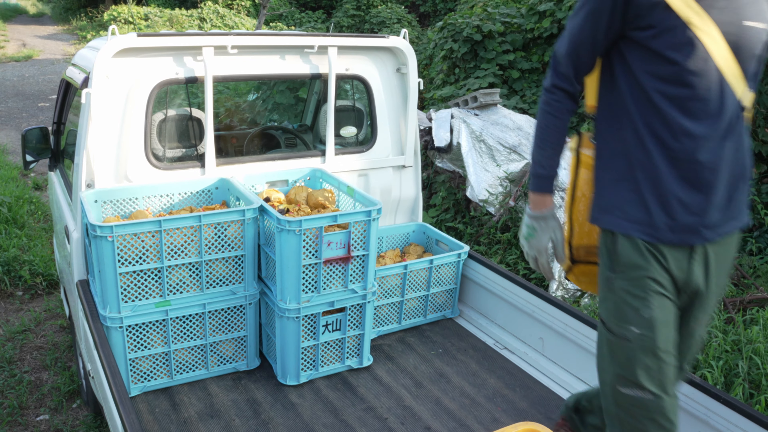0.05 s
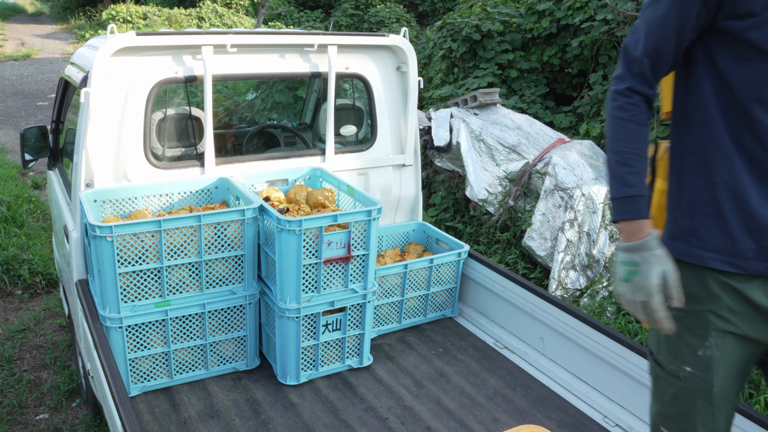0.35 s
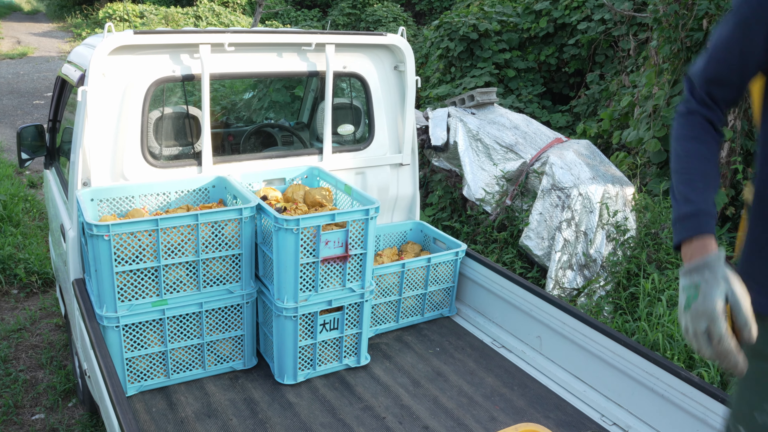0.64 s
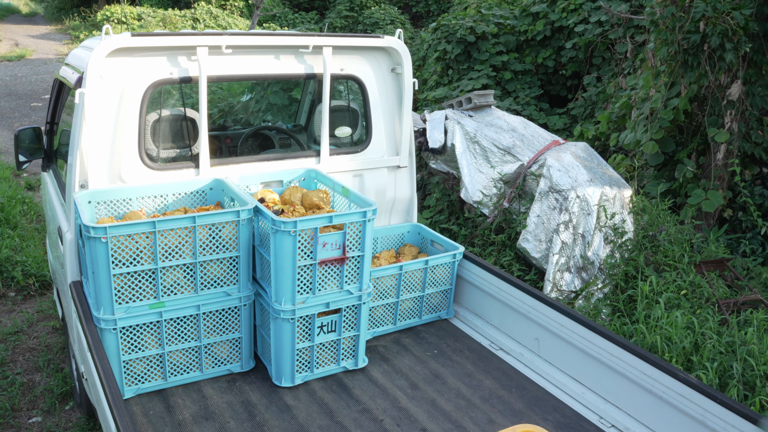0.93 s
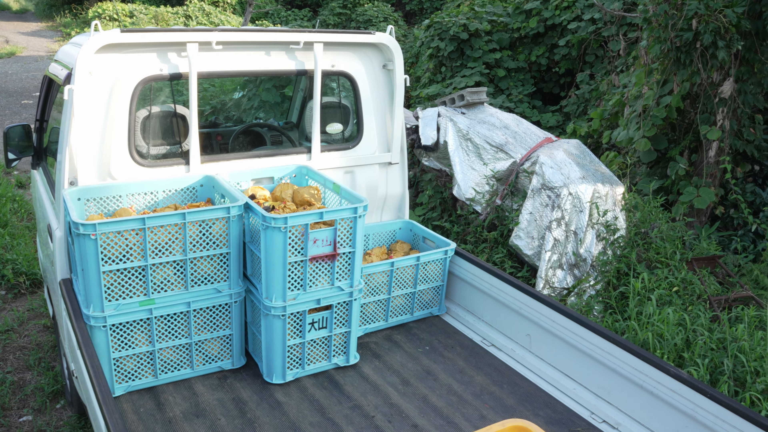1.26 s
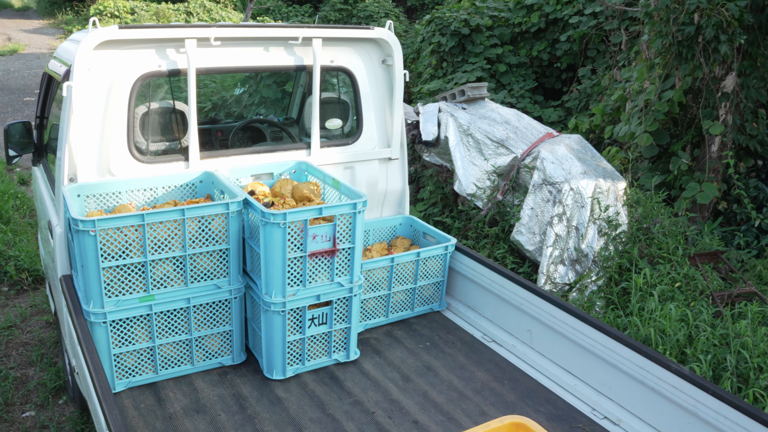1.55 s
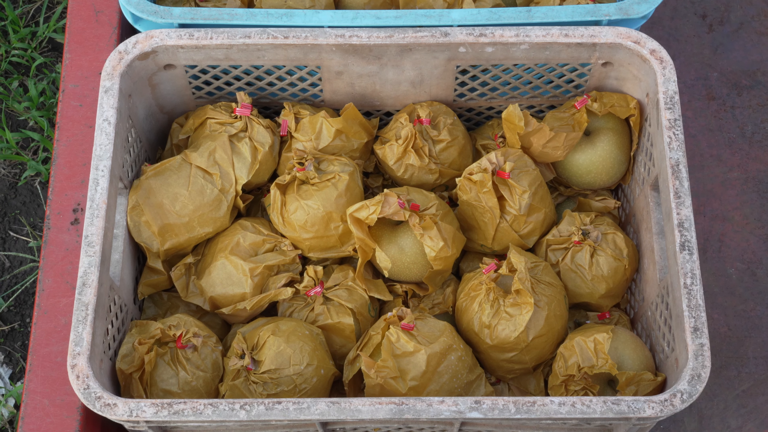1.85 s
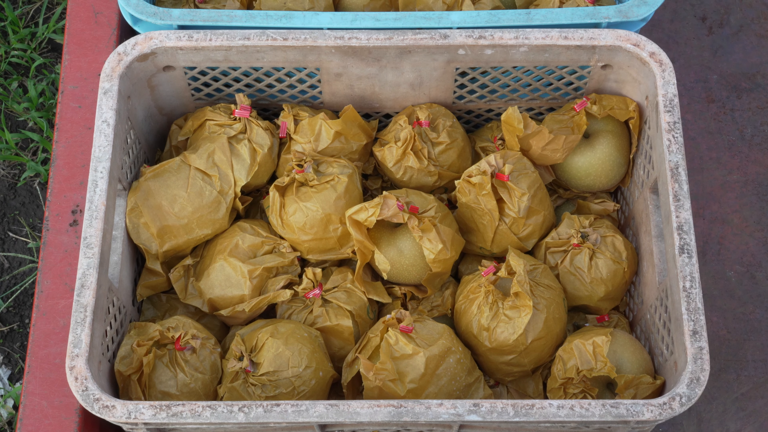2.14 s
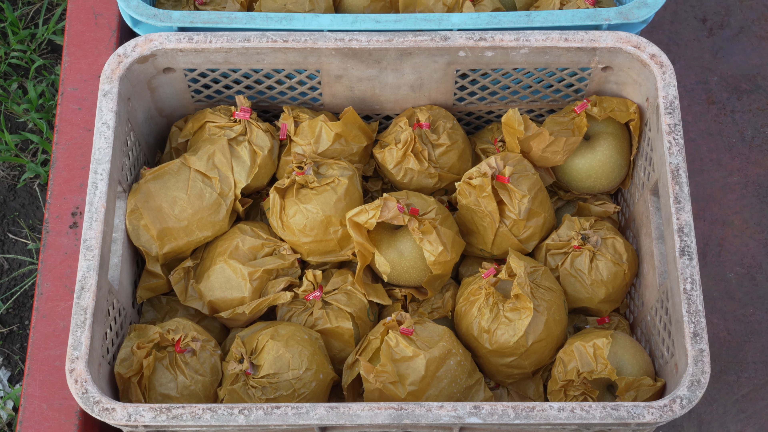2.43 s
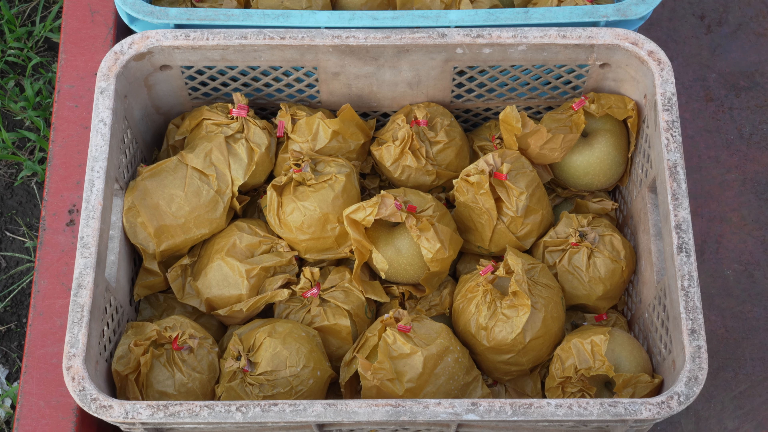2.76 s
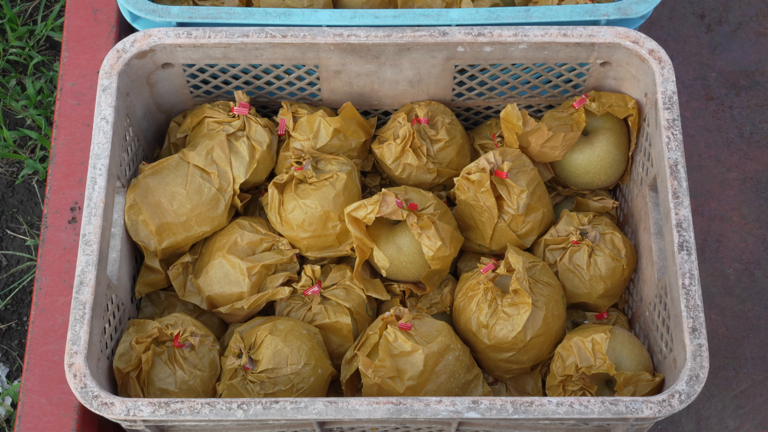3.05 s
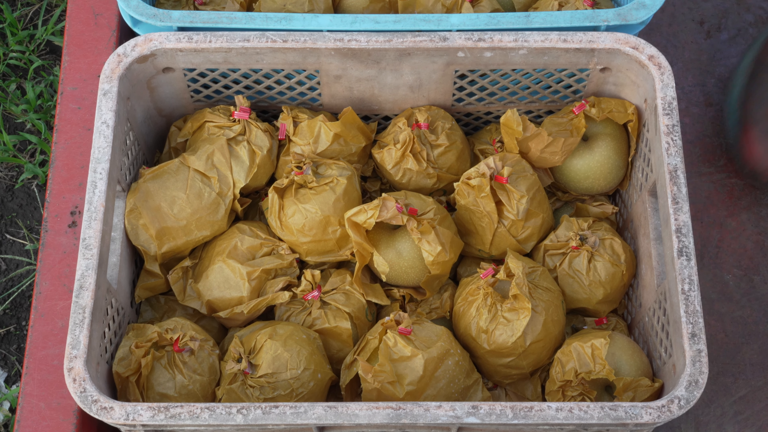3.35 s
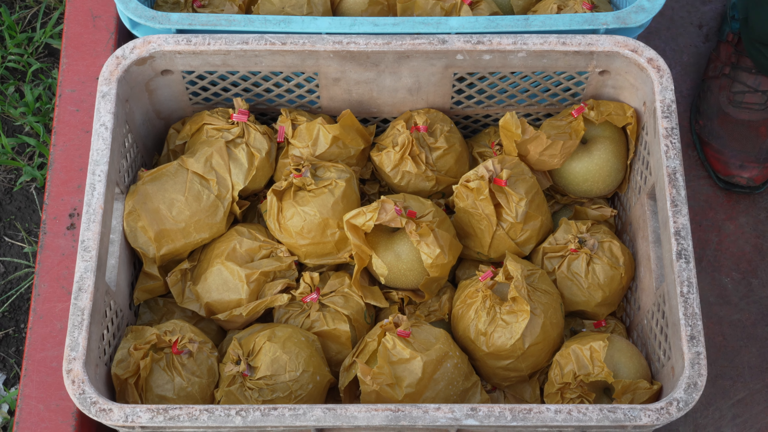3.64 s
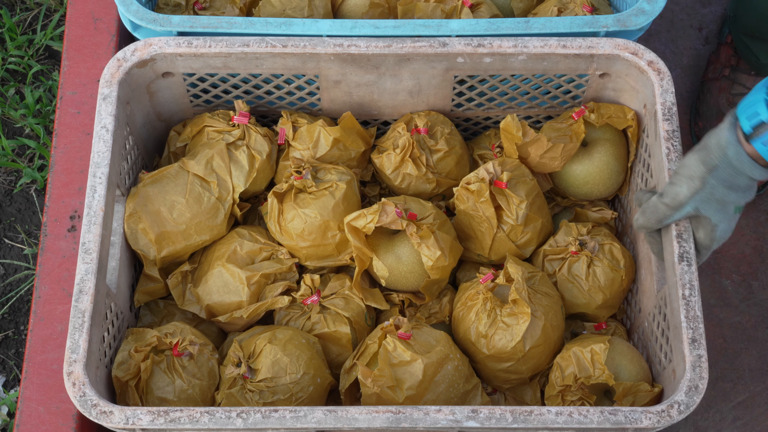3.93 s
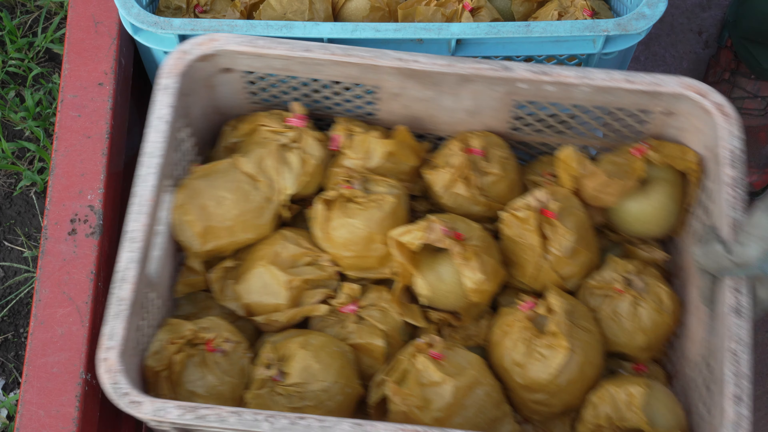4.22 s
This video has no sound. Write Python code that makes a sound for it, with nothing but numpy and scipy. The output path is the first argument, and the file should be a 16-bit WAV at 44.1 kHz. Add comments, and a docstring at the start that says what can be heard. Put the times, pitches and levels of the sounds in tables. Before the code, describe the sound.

A loaded plastic crate knocks, scrapes and thuds on a small truck's steel bed while insects drone outdoors.

```python
"""Loaded plastic crates are set down and pushed along the steel bed of a small truck, outdoors.
Insects drone throughout, with faint far whistles; one bush cricket stops at 1.8 s.
From the start, each contact clacks in the crate and booms in the bed; the sharpest comes at 3.4 s.
At 4 s a long slide scrapes and groans over the gritty floor by stick-slip, then two short shoves.
The heaviest boom follows at 5.5 s; lighter knocks go on to 7.8 s as the load sways and settles."""
import sys
import numpy as np
from scipy import signal
from scipy.fft import rfft, irfft, next_fast_len
from scipy.io import wavfile
from scipy.ndimage import uniform_filter1d

SR = 44100
rng = np.random.default_rng(int(sys.argv[2]) if len(sys.argv) > 2 else 0)


def inscribe(sig):
    """Save sig as 16-bit PCM at rate SR to the path in sys.argv[1].

    A 1-D sig is mono; a 2-D sig holds one channel per row.
    Samples are clipped to [-1, 1] before scaling.
    """
    pcm = np.round(np.clip(np.atleast_2d(sig).T, -1, 1) * 32767)
    wavfile.write(sys.argv[1], SR, pcm.astype(np.int16))


N = 365148
T = np.arange(N) / SR

# crate contacts: (time [s], clack [dB], floor boom [dB], boom centre [Hz], side panel [dB])
CONTACTS = [(0.0344, -35, -35, 181, -32.5), (0.1272, -24.5, -46, 73, -44), (0.606, -32, -47, 100, -57),
            (0.824, -16, -16, 201, -26.5), (0.8408, -29, -30, 151, -32), (0.8843, -35, -22, 98, -32.5),
            (1.2389, -50, -34, 115, -38), (1.5209, -38, -43, 258, -30), (1.7398, -33, -38.5, 83, -49),
            (1.7885, -32, -34, 118, -37.5), (2.0087, -39, -54, 110, -46), (2.471, -30, -38, 105, -46),
            (2.4979, -22, -44, 46, -44), (2.5047, -18.5, -40, 105, -32), (2.59, -14.5, -34.5, 100, -34.5),
            (2.7134, -42, -32.5, 86, -42), (3.3928, -10, -21.5, 122, -38), (3.417, -20, -32, 110, -42),
            (3.4311, -16.5, -26, 102, -36), (3.4765, -25, -50, 116, -40), (3.5064, -24, -53, 102, -31),
            (3.5375, -21.5, -47, 105, -30), (3.761, -45, -34.5, 94, -41), (5.0297, -30, -34.5, 102, -34),
            (5.4214, -22, -28, 135, -23), (5.4695, -24, -18.5, 175, -21.5), (5.4832, -17, -8.5, 85.5, -17),
            (5.5688, -42.5, -17.5, 86, -36), (6.158, -28, -33, 97, -38), (6.226, -20, -30.5, 89, -35),
            (6.5598, -34, -39.5, 233, -38), (6.832, -26, -40.5, 102, -41), (6.9128, -16, -49, 73, -38.5),
            (7.0267, -30, -46, 83, -44), (7.3045, -26.5, -32.5, 93, -36.5), (7.4389, -31, -54, 258, -49),
            (7.8373, -24, -48, 118, -37.5)]
# steel floor; crate walls and ribs: (frequency [Hz], level [dB], t60 [s])
FLOOR_MODES = [(52, -18, 0.12), (64, -11, 0.34), (90.7, 3.5, 0.29), (112.2, 2, 0.29), (130.4, -4, 0.12),
               (149.2, -1, 0.2), (191, -3, 0.13), (232.2, -1, 0.13)]
CRATE_MODES = [(1033, -13, 0.37), (1186, -5, .08), (1395, 3, 0.31), (1500, -4, 0.29), (1660, 15, 0.08),
               (1923, -20, 0.056), (2110, 14, 0.065), (2210, 1, 0.1), (2600, -23.5, 0.082),
               (2638, 6.5, 0.074), (2700, -10.5, 0.13), (3450, -16, 0.056), (3840, -10, 0.088),
               (4130, -11, 0.055), (5130, 0, 0.05)]
# crate cavity: (frequency [Hz], density [dB])
HOLLOW_SPECTRUM = [(150, -8), (400, -1), (750, -8), (1100, -4), (1600, -9.5), (2500, -13), (5000, -20),
                   (10000, -26)]
# left-right likeness of near and far sound: (frequency [Hz], correlation [-])
NEAR_CORRELATION = [(100, 1), (450, 1), (800, 0.82), (1500, 0.85), (2700, 0.66), (4000, 0.48),
                    (6000, 0.063), (9500, -0.16), (14000, -0.044)]
FAR_CORRELATION = [(100, 1), (450, 0.78), (750, 0.3), (1500, 0.3), (2300, -0.13), (3400, -0.48),
                   (4500, -0.54), (6000, 0.3), (8000, 0.32), (10500, -0.079), (13500, .22), (16000, 0.063)]


def from_db(db):
    """Decibels to gain."""
    return 10 ** (np.asarray(db) / 20)


def unit_rms(x):
    """Scale to rms 1."""
    return x / np.sqrt(np.mean(x ** 2) + 1e-20)


def unit_energy(x):
    """Scale a response to pass white noise at unchanged level."""
    return unit_rms(x) / np.sqrt(x.shape[-1])


def at_hz(points, hz):
    """Read a table on a log-frequency axis."""
    points_hz, values = np.transpose(points)
    return np.interp(np.log(hz + 1), np.log(points_hz), values)


def drift(rate_hz):
    """Random wander, spread about 1."""
    knots = rng.standard_normal(int(T[-1] * rate_hz) + 2)
    return np.interp(T * rate_hz, np.arange(len(knots)), unit_rms(knots))


def lowpass(x, hz):
    """Two-pole low-pass."""
    return signal.sosfilt(signal.butter(2, hz, fs=SR, output="sos"), x + 1e-18)


def pan(left_db):
    """Stereo gains for a left-over-right level."""
    return from_db(np.array([[left_db], [-left_db]]) / 2)


def add(track, time_s, sound):
    """Mix a sound in at time_s."""
    at = max(round(time_s * SR), 0)
    track[..., at:at + sound.shape[-1]] += sound[..., :N - at]


def noise(spectrum, correlation, size=N):
    """Coloured stereo noise, rms 1."""
    padded = next_fast_len(size, True)
    hz = np.arange(padded // 2 + 1) * SR / padded
    mid, side = rfft(rng.standard_normal((2, padded)))
    alike = np.clip(at_hz(correlation, hz), -1, 1)
    stereo = np.sqrt(1 + alike) * mid + np.sqrt(1 - alike) * side * [[1], [-1]]
    return unit_rms(irfft(stereo * from_db(at_hz(spectrum, hz)), padded)[:, :size])


def dense_modes(spectrum, t60_s, size):
    """Countless overlapping modes: decaying noise."""
    return unit_energy(noise(spectrum, NEAR_CORRELATION, size) * from_db(-60 * T[:size] / t60_s))


def clear_modes(modes, size=32768, spread_db=5.5, pan_spread_db=0.3):
    """Separate modes: decaying sines, level and direction varying with the spot touched."""
    t = T[:size]
    strength, side = rng.standard_normal((len(modes), 2)).T
    ring = 0
    for k, (hz, db, t60_s) in enumerate(modes):
        envelope = from_db(db + spread_db * strength[k] - 60 * t / t60_s)
        ring += (-1) ** k * pan(pan_spread_db * side[k]) * envelope * np.sin(2 * np.pi * hz * t)
    return unit_energy(ring)


def excite(force, response):
    """Drive a body's stereo response with a force, skipping silent ends."""
    first, last = np.flatnonzero(force)[[0, -1]]
    sound = signal.fftconvolve(force[None, first:last + 1], np.atleast_2d(response), axes=1)
    out = np.zeros((len(sound), min(len(force) + response.shape[-1], N)))
    add(out, first / SR, sound)
    return out


def slips(per_s, spread_db, size=N):
    """Random stick-slip impulses of uneven strength, rms 1."""
    chance = rng.random(size)
    at = np.flatnonzero(chance < per_s / SR)
    strength = np.minimum(-np.log(chance[at] * SR / per_s + 1e-9), 4)
    out = np.zeros(size)
    out[at] = from_db(spread_db * strength) * rng.choice([-1, 1], size)[at]
    return unit_rms(out)


def outdoor_air():
    """Low, slightly wavering rush."""
    spectrum = [(25, -1), (60, -6.5), (100, -3.5), (160, -10.5), (300, -10), (450, -11.5), (700, -15.5),
                (1100, -19.5), (2500, -40)]  # (frequency [Hz], density [dB])
    return from_db(-52 + 1.2 * drift(6.1)) * noise(spectrum, FAR_CORRELATION) * pan(-1.3)


def whistles(blur_hz=70, blur_share=0.63, faint_db=-51, faint_count=36):
    """Distant glides, mostly rising, smeared on their way; fainter ones at random times."""
    # whistles: (time [s], length [s], start [Hz], end [Hz], level [dB])
    glides = [(0.325, 0.17, 2350, 2480, -49), (0.437, 0.17, 1540, 1690, -50), (0.676, 0.2, 1470, 2220, -44),
              (1.687, 0.12, 1800, 2250, -46), (2.99, 0.13, 1815, 2200, -46), (5.533, 0.11, 1730, 2090, -46),
              (6.27, .05, 4100, 3720, -48), (6.33, .05, 4050, 3500, -45), (6.82, 0.12, 1800, 2120, -40),
              (7.722, 0.074, 2150, 2900, -48), (8.096, 0.11, 1570, 1940, -45)]
    faint = [(when * T[-1], 0.12, 1450 + 800 * pitch, 1800 + 950 * pitch, faint_db)
             for when, pitch in rng.random((faint_count, 2))]
    out = np.zeros(N)
    for time_s, length_s, start_hz, end_hz, db in glides + faint:
        along = np.linspace(0, 1, int(length_s * SR))
        hz = start_hz + (end_hz - start_hz) * along ** 1.4
        add(out, time_s, from_db(db) * np.sin(np.pi * along) * np.sin(2 * np.pi * np.cumsum(hz) / SR))
    blur = unit_rms(lowpass(rng.standard_normal(N), blur_hz))
    return out * unit_rms(1 + blur_share * blur) * pan(-1.7)


def insects(pulse_hz=14, solo_stop_s=1.84, solo_fade_s=0.15):
    """Cicadas buzz, bush crickets pulse above, a far chorus lies below; one lower cricket stops early."""
    # song spectra: (frequency [Hz], density [dB])
    cicada_band = [(3500, -21), (4500, -4.5), (5200, 2), (6200, 3.5), (7300, -1.5), (8500, -8.5),
                   (10000, -17)]
    cricket_band = [(8000, -26), (10500, -4.5), (12600, 1), (13400, 8), (14600, 8.5), (15800, 6),
                    (17000, -21.5)]
    solo_band = [(8000, -25), (10500, -8), (11800, 1.5), (14500, 1), (16000, -4)]
    chorus_band = [(900, -32.5), (1250, -11), (1500, -1), (1750, -1), (2200, -0.5), (3300, -5),
                   (4500, -4.5), (9000, -15), (16000, -21)]
    phase = 2 * np.pi * np.cumsum(pulse_hz + 0.36 * drift(2.6)) / SR
    cicada_db = -39.5 + 0.73 * np.sin(2 * phase) + 0.64 * drift(12)
    cicadas = from_db(cicada_db) * noise(cicada_band, FAR_CORRELATION)
    cricket_db = -38.5 + 0.71 * np.sin(phase) + 0.9 * drift(10)
    crickets = from_db(cricket_db) * noise(cricket_band, FAR_CORRELATION)
    singing = np.clip((solo_stop_s - T) / solo_fade_s, 0, 1)
    solo = singing * from_db(-43 + np.sin(phase)) * noise(solo_band, FAR_CORRELATION)
    chorus = from_db(-42 + 0.26 * drift(13)) * noise(chorus_band, FAR_CORRELATION)
    return (cicadas + crickets + solo + chorus) * pan(0.7)


def floor_shudder(offset_db=-26.5, db_per_boom_db=0.58, fall_db_per_s=25.5):
    """Each blow sets the floor trembling; the swaying load keeps it going."""
    sways = [(2.55, .45, -44), (3.62, .3, -43), (5.12, 0.3, -44), (5.8, 0.28, -42), (6.096, 0.47, -37),
             (6.9, 0.48, -47.5), (8.018, 0.18, -46.5)]  # (time [s], length [s], level [dB])
    # trembling floor: (frequency [Hz], density [dB])
    spectrum = [(50, -23), (75, -14), (90, 0), (108, 0), (135, -5), (230, -15), (500, -39)]
    power = np.zeros(N)
    envelope = from_db(-fall_db_per_s * T) * np.minimum(T / 0.03, 1)
    for time_s, _, boom_db, _, _ in CONTACTS:
        add(power, time_s, (from_db(offset_db + db_per_boom_db * boom_db) * envelope) ** 2)
    for time_s, length_s, db in sways:
        add(power, time_s, (from_db(db) * np.sin(np.linspace(0, np.pi, int(length_s * SR)))) ** 2)
    return np.sqrt(power) * noise(spectrum, NEAR_CORRELATION)


def settling():
    """A settling crate scuffs: grit sounds in its hollow and rings its walls."""
    scuffs = [(0.0, 0.036, 0.071, -42.5), (1.23, 0.047, 0.096, -51), (2.589, 0.018, 0.075, -33.5),
              (3.41, 0.033, 0.07, -36.5), (6.149, 0.012, 0.12, -37.5), (6.215, 0.051, 0.086, -37.5)]  # (time [s], swell [s], decay [s], level [dB])
    rubbing = np.zeros(N)
    for time_s, swell_s, decay_s, db in scuffs:
        swell = np.clip((T - time_s) / swell_s, 0, 1)
        rubbing += from_db(db) * swell * np.exp(-np.maximum(T - time_s - swell_s, 0) / decay_s)
    hollow = from_db(-0.5 + 1.5 * drift(300)) * rubbing * noise(HOLLOW_SPECTRUM, NEAR_CORRELATION)
    force = lowpass(rubbing * slips(per_s=1200, spread_db=2.5), hz=1000)
    walls = from_db(1.5) * excite(force, clear_modes(CRATE_MODES, size=8000, spread_db=1.5))
    return (hollow + walls) * pan(-3.3)


def groans(wander_share=0.044, tremble_db=2):
    """A dragged foot locks onto one resonance: near-regular stick-slip, a brief rough tone."""
    tones = [(4.181, 0.19, 1416, -28), (4.36, 0.19, 405.5, -23), (4.737, 0.14, 1426, -27),
             (5.414, 0.087, 409.6, -19)]  # (time [s], length [s], pitch [Hz], level [dB])
    out = np.zeros(N)
    for time_s, length_s, hz, db in tones:
        swell = np.sin(np.linspace(0, np.pi, int(length_s * SR)))
        waver, tremble = unit_rms(lowpass(rng.standard_normal((2, SR // 2)), hz=90))[:, :len(swell)]
        phase = 2 * np.pi * np.cumsum(hz * (1 + wander_share * waver)) / SR
        add(out, time_s, from_db(db + tremble_db * tremble) * swell * np.sin(phase))
    return out * pan(-0.89)


def panel_response(size=20000):
    """Steel side panels: dull bang, faint long ring, clear modes."""
    steel = [(120, -33), (220, -7.5), (320, 0.5), (450, -0.5), (600, -6), (800, -15.5), (2000, -31)]  # (frequency [Hz], density [dB])
    modes = [(197, -8.5, 0.44), (233.5, -7.5, 0.51), (272, 2, 0.1), (332.1, -1, 0.28), (365, 0.5, 0.068),
             (389.5, -2.5, 0.43), (425, -0.5, 0.23), (470.3, 0, 0.29), (520, -3.5, 0.32), (566, -8, 0.51),
             (657, -6, 0.37)]  # (frequency [Hz], level [dB], t60 [s])
    bang = from_db(-2.5) * dense_modes(steel, t60_s=0.091, size=size)
    ring = from_db(-7) * dense_modes(steel, t60_s=0.92, size=size)
    return bang + ring + from_db(-4.5) * clear_modes(modes, size)


def crate_response(modes_db, ring_db, size=6000):
    """Crate touched at one spot: a short crack, then walls and ribs ring."""
    plastic = [(250, -23.5), (500, -4), (750, -14), (1000, -6), (1400, 2.5), (1900, -5), (2700, -2),
               (3200, -6.5), (4200, -9.5), (6500, -11), (9500, -19), (16000, -27)]  # (frequency [Hz], density [dB])
    modes = from_db(modes_db) * clear_modes(CRATE_MODES, size, spread_db=4.5)
    ring = from_db(ring_db) * dense_modes(plastic, t60_s=0.15, size=size)
    crack = dense_modes(plastic, t60_s=0.017, size=size)
    return crack + modes + ring


def slide_forces(speed_power=1.23, grit_lag_ratio=1.85, ease_db_per_s=3):
    """Push speed drives friction, grit, panels and floor; grit gathers late, friction eases under way."""
    # pushes: (time [s], speed-up [s], steady [s], slow-down [s],
    #          friction [dB], grit [dB], side panel [dB], floor rumble [dB])
    pushes = [(3.40, 0.014, .13, .06, -52, -43, -52, -55), (4.035, .18, .69, .175, -19.5, -23, -27, -36),
              (5.105, 0.039, .018, 0.034, -32.5, -32, -34.5, -43),
              (5.417, .003, 0.055, 0.013, -22.5, -33, -23.5, -26)]
    # feet catch and bear down:
    # (time [s], half-width [s], friction [dB], grit [dB], side panel [dB], floor rumble [dB])
    catches = [(4.3, .045, 1.5, -0.5, -2, 1), (4.41, 0.082, 0.38, 2, 5, 6.5),
               (4.666, .025, 1.5, 5, 6, -2.5)]
    forces = np.zeros((4, N))
    for time_s, rise_s, steady_s, fall_s, *levels_db in pushes:
        age_s = np.maximum(T - time_s, 0)
        braking = np.clip((rise_s + steady_s + fall_s - age_s) / fall_s, 0, 1)
        drive = (np.minimum(age_s / rise_s, 1) * braking) ** speed_power
        gathered = np.minimum(age_s / (rise_s * grit_lag_ratio), 1) ** 1.4 * braking ** 0.86
        for force, shape, db in zip(forces, (drive, gathered, drive, drive), levels_db):
            force += shape * from_db(db - ease_db_per_s * age_s)
    for time_s, width_s, *gains_db in catches:
        bell = np.exp(-np.minimum(((T - time_s) / width_s) ** 2, 20))
        forces *= from_db(np.outer(gains_db, bell))
    return forces


def slides(judder_db=1.2, load_shift_db=4, feet=6):
    """Feet dragged over grit: each slips on its own and rings the crate from its own spot."""
    grit_band = [(2500, -25), (4000, 2.5), (6000, -1), (7500, -3.5), (9500, -6.5), (14000, -6),
                 (16000, -19)]  # (frequency [Hz], density [dB])
    friction, grit_force, panel_force, floor_force = slide_forces()
    judder = from_db(judder_db * drift(140))
    crate, panels = 0, 0
    for foot in range(feet):
        rub = slips(per_s=3500, spread_db=2) * judder / np.sqrt(feet)
        rub *= unit_rms(from_db(load_shift_db * drift(16)))  # load shifts between feet
        crate += excite(rub * friction, crate_response(modes_db=-13, ring_db=-3))
        if foot % 2:
            panels += excite(rub * panel_force, panel_response())
    grit = noise(grit_band, NEAR_CORRELATION) * judder * from_db(2 * drift(900)) * grit_force
    floor_slips = slips(per_s=3000, spread_db=-2.5) * floor_force
    floor = excite(floor_slips, clear_modes(FLOOR_MODES, spread_db=1))
    scrape = crate * pan(-2) + grit * pan(-0.8) + (panels + floor) * pan(-0.28)
    # the scrape is cut below about 70 Hz, so it carries little deep bass
    return signal.sosfilt(signal.butter(4, 68, "high", fs=SR, output="sos"), scrape + 1e-18)


def contact_force(boom_db, chatter_s=0.018, size=4096):
    """One blow, then dying chatter of the feet; light taps chatter less."""
    chatter_gain = 0.045 * from_db(0.32 * min(boom_db + 34, 0))
    force = chatter_gain * slips(per_s=900, spread_db=3, size=size) * np.exp(-T[:size] / chatter_s)
    force[0] += 1
    return unit_energy(force)


def knocks(clack_share=0.39, focus_db_per_oct2=7.5, spot_count=7, size=4096):
    """Contacts ring crate walls, hollow, panels and floor; plastic snaps and bed thumps join in."""
    snaps = [(3.539, -2), (5.469, -1)]  # (time [s], level [dB])
    snap_band = [(3000, -26), (5500, -17), (7000, 9), (10000, -3), (16000, -10)]  # (frequency [Hz], density [dB])
    thumps = [(0.18, -38), (1.788, -30), (7.31, -38)]  # (time [s], level [dB])
    thump_hz, thump_t60_s = 52, 0.31
    crate, bed = np.zeros((2, 2, N))
    spots = [(crate_response(modes_db=-13.5, ring_db=-7.5), panel_response()) for _ in range(spot_count)]
    for k, (time_s, clack_db, boom_db, boom_hz, panel_db) in enumerate(CONTACTS):
        walls, panels = spots[k % spot_count]
        blow = contact_force(boom_db)
        hard_blow, dull_blow = lowpass(blow, hz=2370), lowpass(blow, hz=530)
        hollow = dense_modes(HOLLOW_SPECTRUM, t60_s=0.06, size=size)
        hollow_db = clack_share * clack_db + (1 - clack_share) * panel_db
        add(crate, time_s, from_db(clack_db + 15) * excite(hard_blow, walls))
        add(crate, time_s, from_db(hollow_db + 18) * excite(hard_blow, hollow))
        add(bed, time_s, from_db(panel_db + 28.5) * excite(dull_blow, panels))
        # soft landings reach the low floor modes, quick ones the higher
        reached = [(hz, db - focus_db_per_oct2 * np.log2(hz / boom_hz) ** 2, t60_s)
                   for hz, db, t60_s in FLOOR_MODES]
        add(bed, time_s, from_db(boom_db + 29.5) * clear_modes(reached, size=14000, spread_db=1))
    for time_s, db in snaps:
        add(crate, time_s, from_db(db) * dense_modes(snap_band, t60_s=0.013, size=size))
    t = T[:SR // 2]
    for time_s, db in thumps:
        add(bed, time_s, from_db(db - 60 * t / thump_t60_s) * np.sin(2 * np.pi * thump_hz * t))
    return crate * pan(-7) + bed * pan(-1.1)


def scene():
    """Truck bed close by, countryside behind."""
    air = outdoor_air()
    truck = knocks() + slides() + groans() + settling() + floor_shudder()
    return air + truck + insects() + whistles()


def gain_control(x, threshold_db=-13, cut_share=0.44, recovery_db_per_s=3):
    """Loud bangs push the gain down at once; it creeps back."""
    power = np.abs(uniform_filter1d(np.mean(x ** 2, axis=0), size=441))
    level_db = 10 * np.log10(power + 1e-12)
    cut_db = cut_share * np.maximum(level_db - threshold_db, 0)
    held_db = np.maximum.accumulate(cut_db + recovery_db_per_s * T) - recovery_db_per_s * T
    return x * from_db(-held_db)


def record(dry, low_cut_hz=39, high_cut_hz=15740):
    """Microphone bass roll-off, gain control, steep top cut."""
    thinned = signal.sosfilt(signal.butter(2, low_cut_hz, "high", fs=SR, output="sos"), dry)
    top_cut = signal.ellip(12, 0.1, 80, high_cut_hz, fs=SR, output="sos")
    return signal.sosfilt(top_cut, gain_control(thinned))


dry = scene()
out = record(dry)
inscribe(out)
```